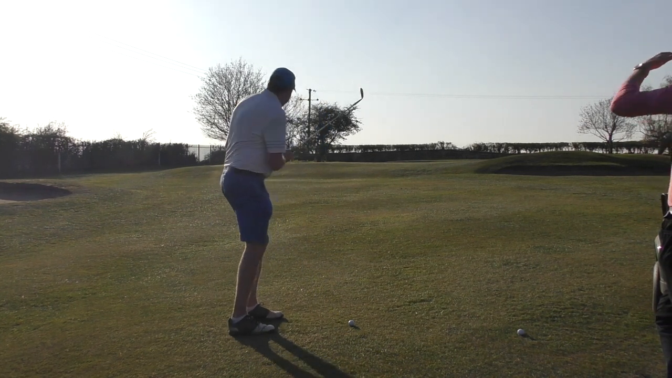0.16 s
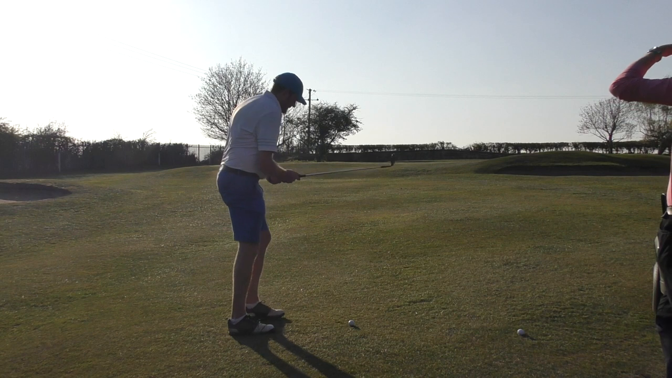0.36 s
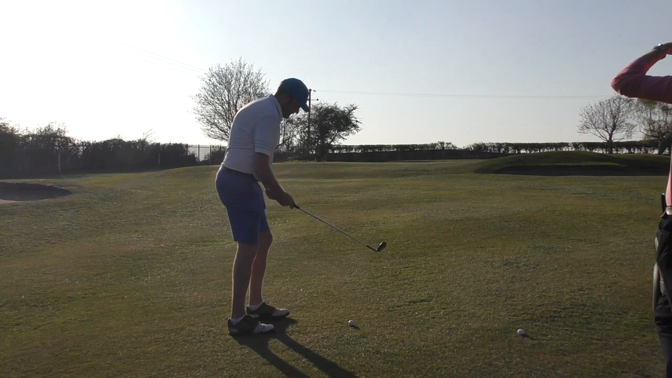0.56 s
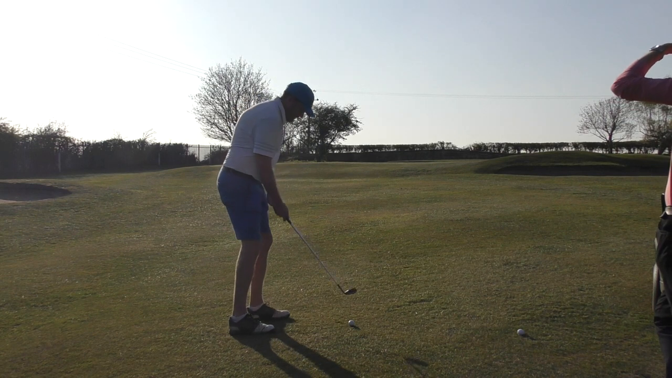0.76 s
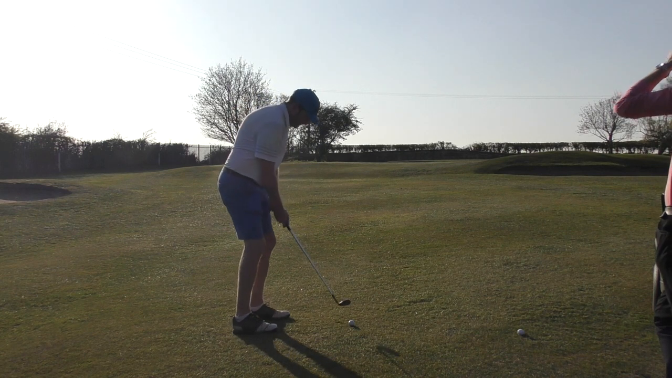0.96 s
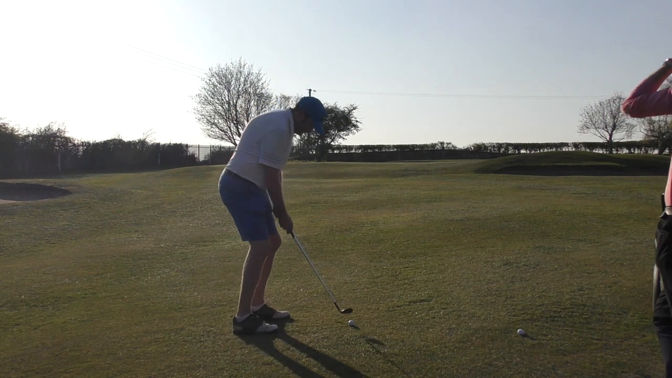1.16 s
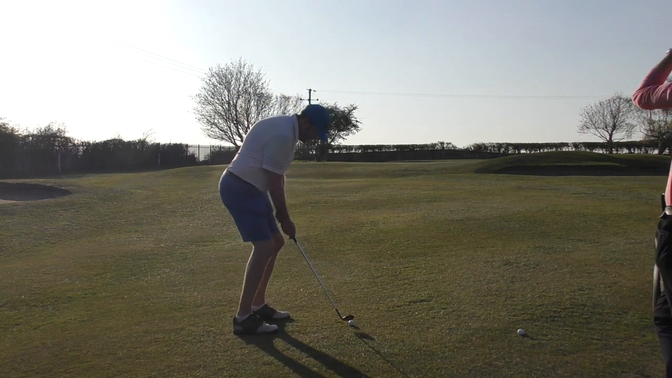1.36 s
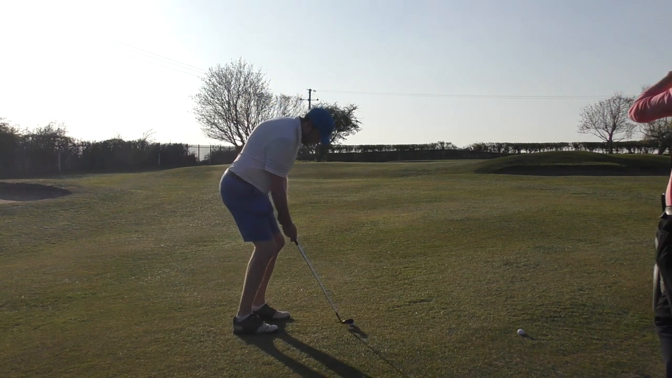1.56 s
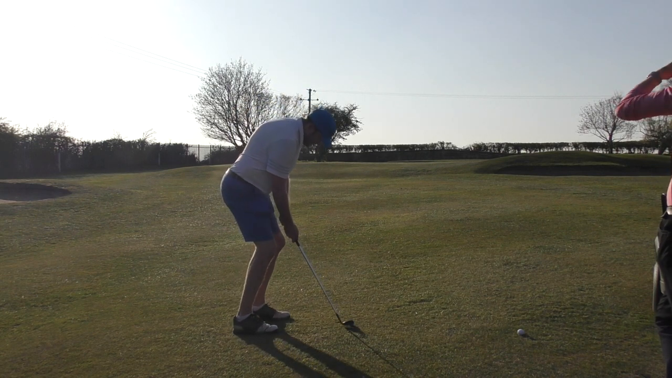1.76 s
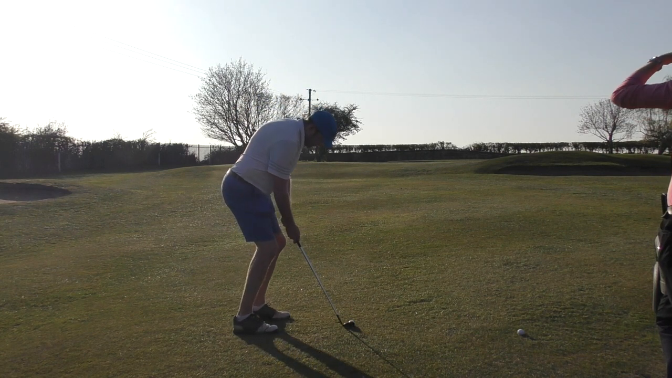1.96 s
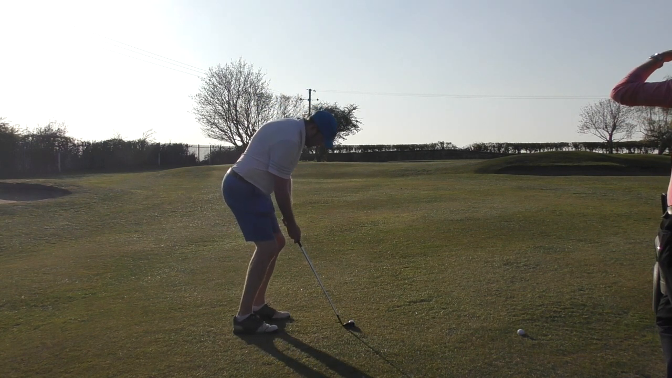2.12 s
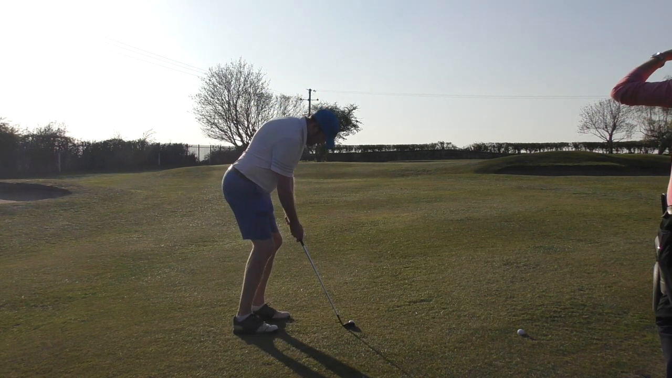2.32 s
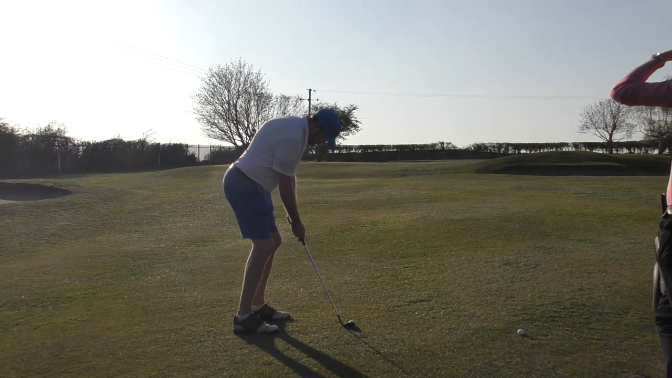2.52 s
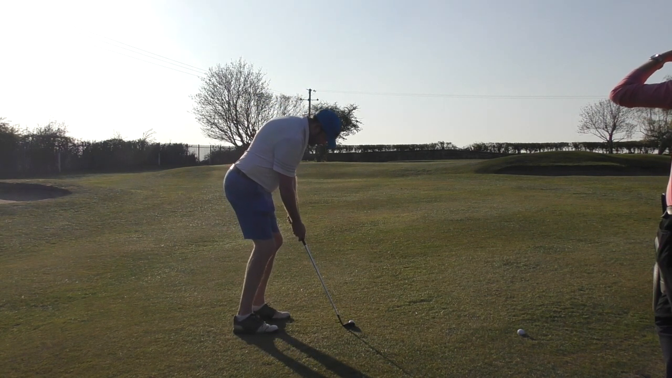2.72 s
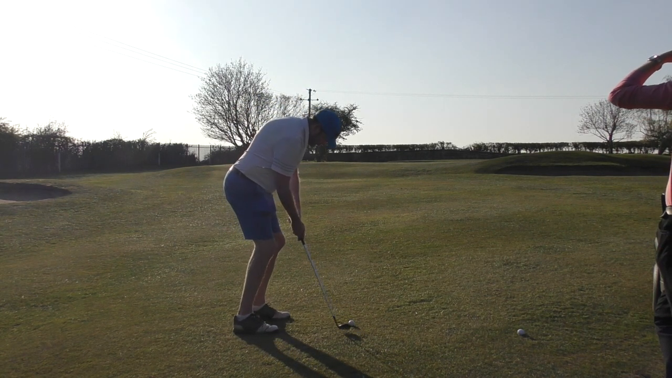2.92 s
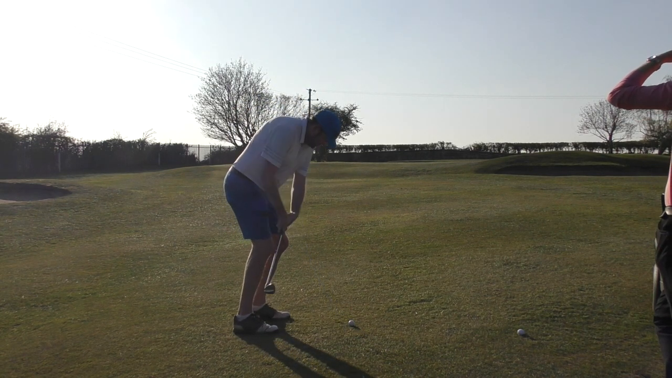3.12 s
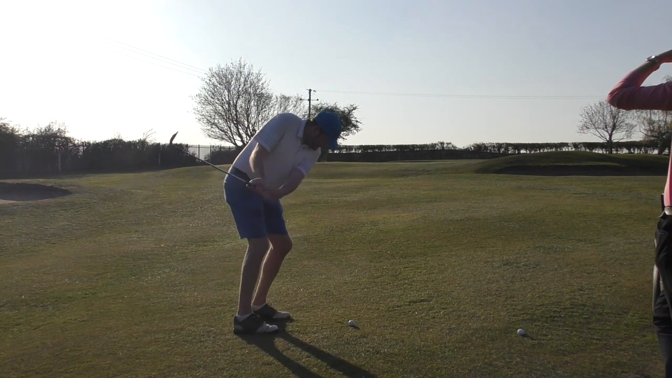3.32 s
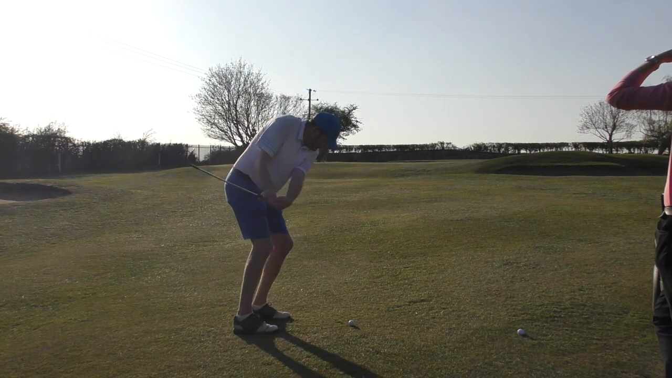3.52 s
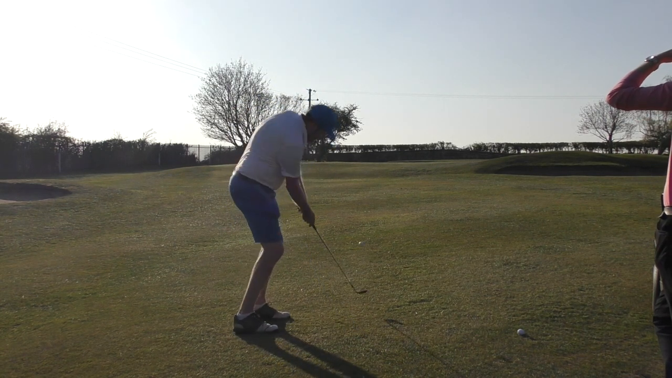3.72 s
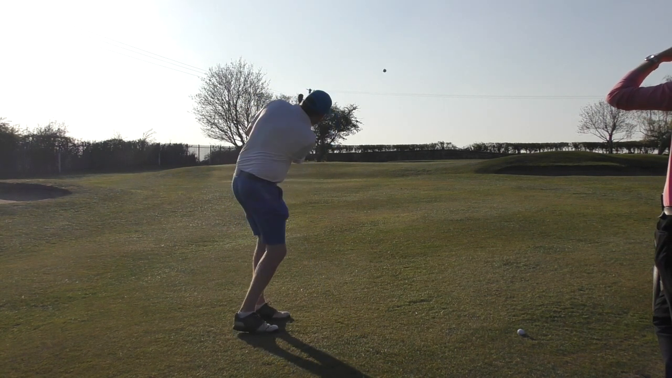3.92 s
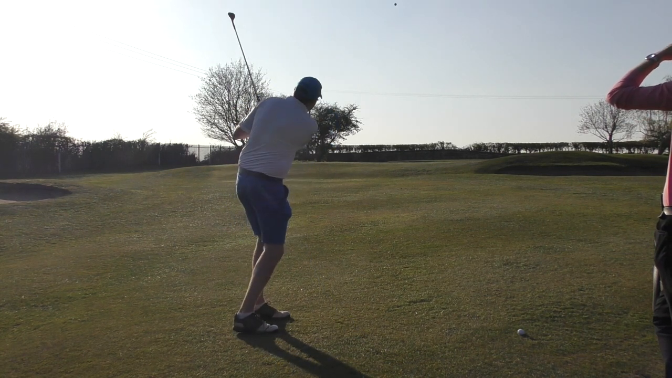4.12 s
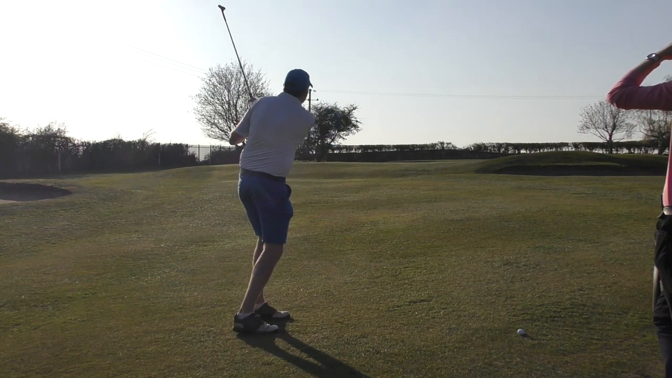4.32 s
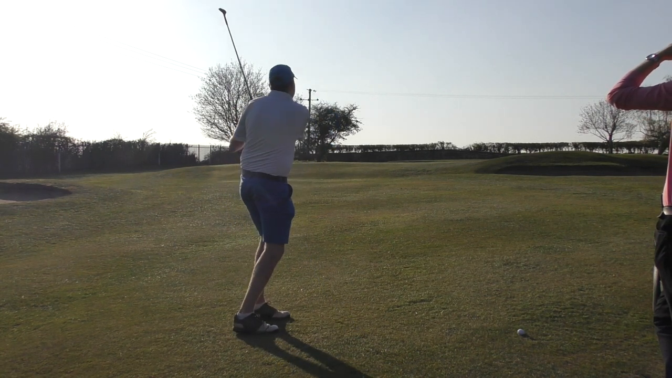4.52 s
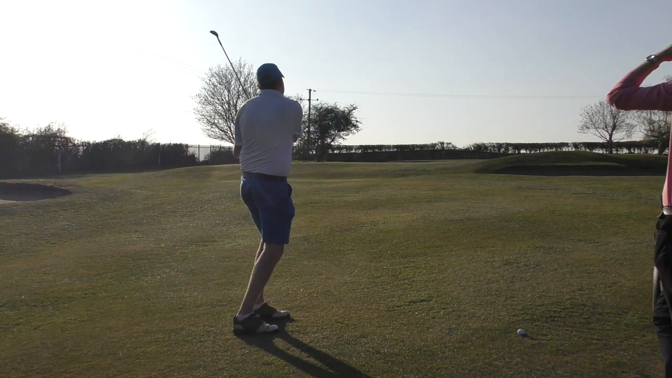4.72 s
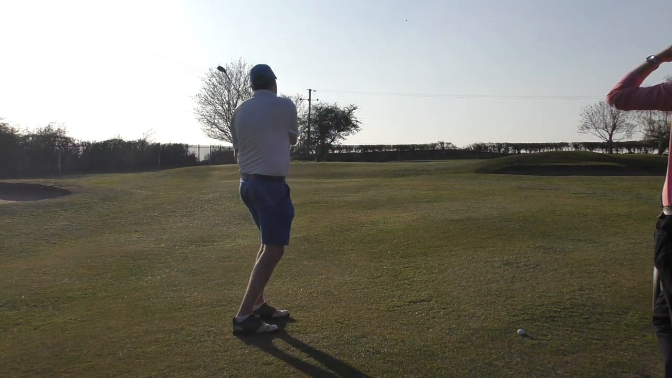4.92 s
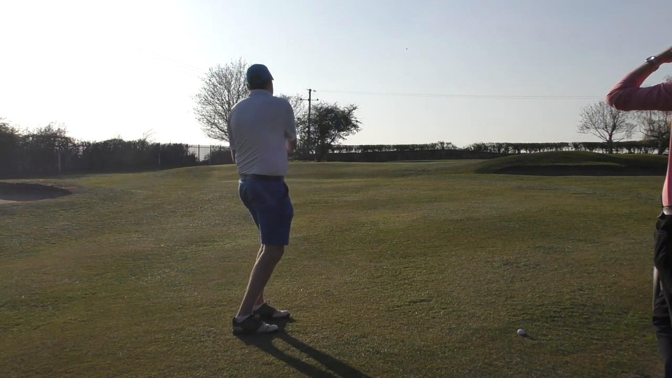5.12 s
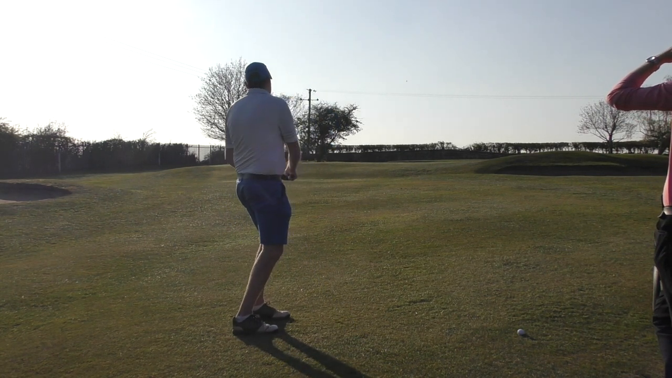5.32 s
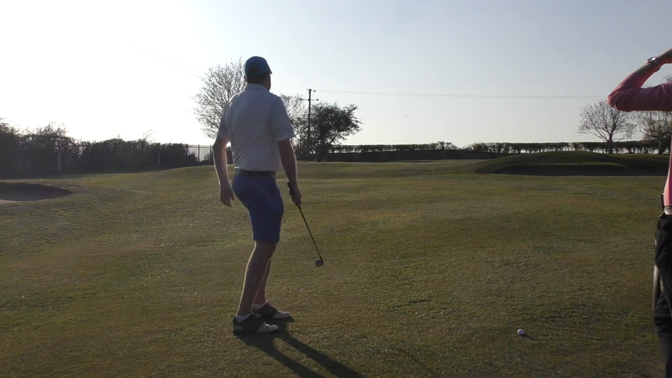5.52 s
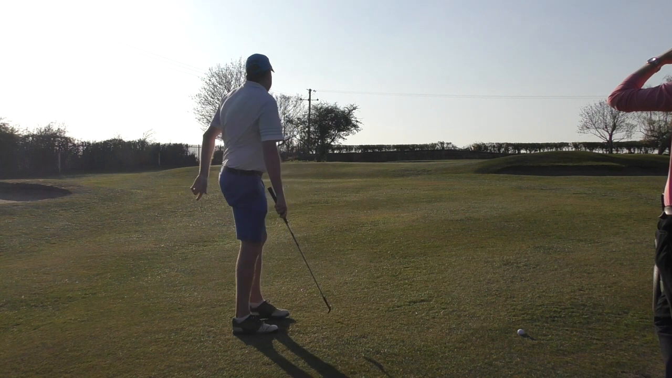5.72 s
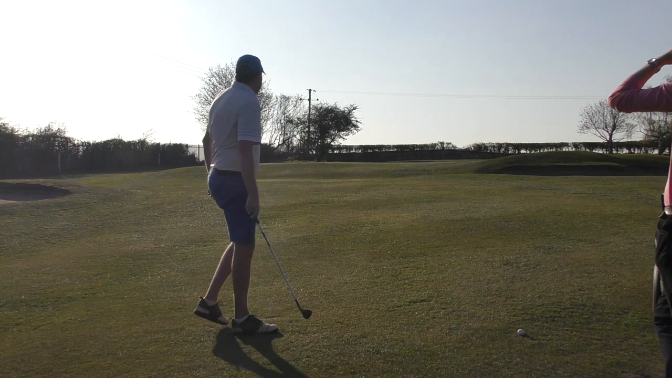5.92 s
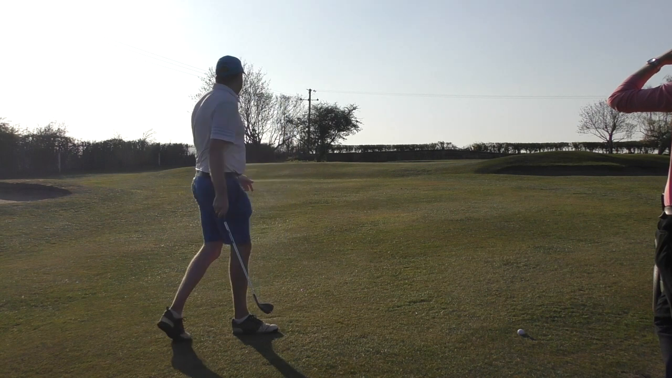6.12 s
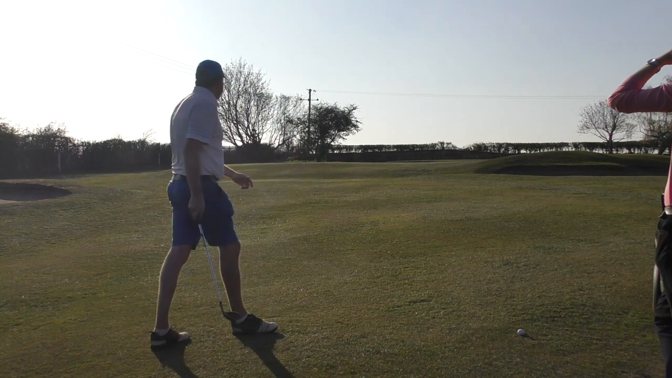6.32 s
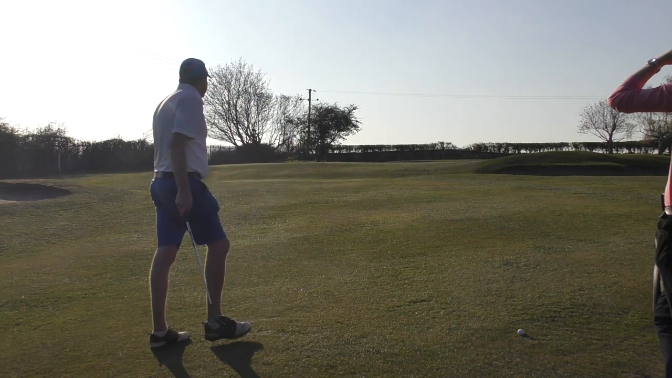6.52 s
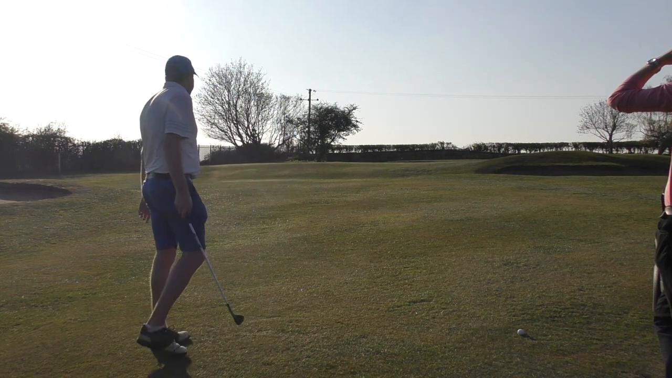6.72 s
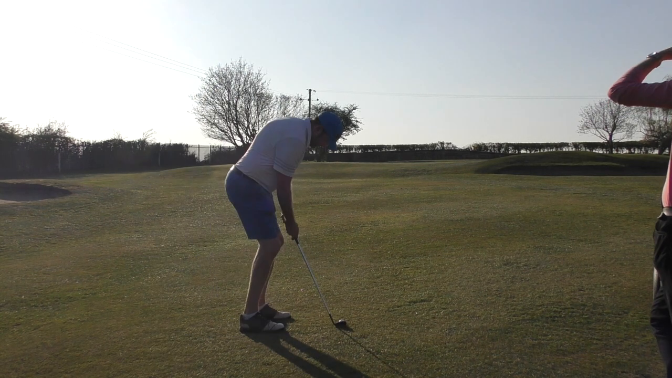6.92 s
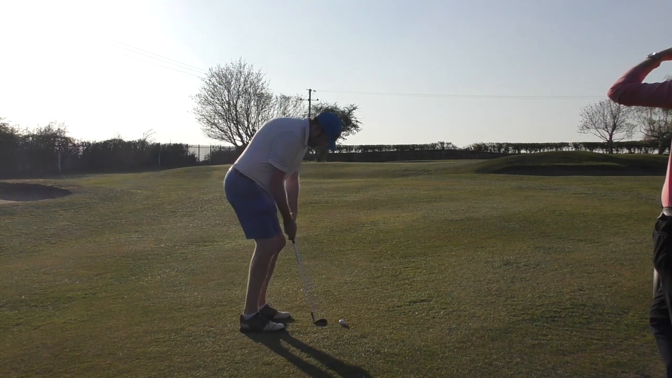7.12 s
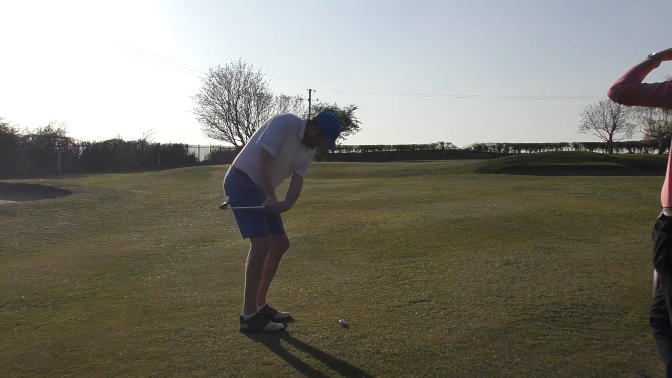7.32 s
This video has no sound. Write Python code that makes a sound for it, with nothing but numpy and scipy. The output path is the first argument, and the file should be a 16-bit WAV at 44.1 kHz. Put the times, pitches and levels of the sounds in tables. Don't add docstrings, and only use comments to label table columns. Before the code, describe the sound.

A golf iron strikes a ball with one loud, dry, sharp click on an open course, over faint birdsong and a low distant rumble.

```python
import sys
import numpy as np
from scipy import signal
from scipy.fft import rfft, irfft
from scipy.io import wavfile
from scipy.ndimage import uniform_filter1d

SR = 44100
rng = np.random.default_rng(int(sys.argv[2]) if len(sys.argv) > 2 else 0)


def bounce(signal):
    frames = np.transpose(np.atleast_2d(signal))
    limited = np.clip(frames, -1, 1)
    pcm = np.round(limited * 32767).astype(np.int16)
    wavfile.write(sys.argv[1], SR, pcm)


def ratio(d):
    e = np.asarray(d, float) / 20
    return 10 ** e


N = 324884
T = np.arange(N) / SR


def unit(x):
    return x / np.sqrt(np.mean(x ** 2))


def curve(rows):
    return np.interp(T, *np.transpose(rows))


def filtered_noise(low_hz, high_hz):
    sos = signal.butter(2, [low_hz, high_hz], "band", fs=SR, output="sos")
    return unit(signal.sosfilt(sos, rng.standard_normal(N)))


def band(n, hz, width_hz):
    settle = 2000
    b, a = signal.iirpeak(hz, hz / (1.5 * width_hz), SR)
    once = signal.lfilter(b, a, rng.standard_normal(n + settle))
    return unit(signal.lfilter(b, a, once)[settle:])


def walk(rate_hz):
    hold = int(SR / rate_hz)
    steps = np.repeat(rng.standard_normal(N // hold + 1), hold)
    return unit(uniform_filter1d(uniform_filter1d(steps, hold), hold)[:N])


def add(out, s, x):
    i = int(s * SR)
    out[i:i + len(x)] += x[:N - i]


def ring(hz, t60_s, length_s=.25):
    t = T[:int(length_s * SR)]
    return np.sin(2 * np.pi * hz * t) * 1000. ** (-t / t60_s)


# f/Hz, density/dB per Hz
TRAFFIC_SPECTRUM = [(55, -18.5), (75, -1), (110, -9.5), (200, -8.5), (280, -11), (420, -9), (520, -7.5),
                    (900, -9), (1250, -8.5), (1700, -17), (2300, -23), (4100, -27.5), (7000, -33),
                    (15800, -37.5)]
# t/s, level/dB
TRAFFIC_SWELL = [(0, -56), (1.99, -57.5), (2.47, -56.5), (3.6, -56), (5.9, -55.5), (6.33, -53.5),
                 (6.92, -57), (7.37, -57)]


def traffic():
    level_db, flicker_db, flicker_hz = -52, 0.252, 8.7
    f = np.maximum(np.arange(N // 2 + 1) * SR / N, 1)
    knot_hz, knot_db = np.transpose(TRAFFIC_SPECTRUM)
    noise = rfft(rng.standard_normal(N)) * ratio(np.interp(np.log(f), np.log(knot_hz), knot_db))
    gain = ratio(level_db) / np.std(irfft(noise, N))
    swell_db = curve(TRAFFIC_SWELL)
    swell_db = swell_db - swell_db.mean()
    out = np.zeros(N)
    for octave in range(9):
        share = np.clip(1 - abs(np.log2(f / 62.5) - octave), 0, 1)
        road = np.exp(-(octave - 3.5) ** 2 / 5)
        out += irfft(noise * share, N) * ratio(road * swell_db + flicker_db * walk(flicker_hz))
    return gain * out


# t/s, level/dB
WIND_GUSTS = [(0, -38), (.5, -34.5), (.96, -33), (1.4, -43.5), (2.1, -40), (2.7, -45), (3.3, -45.5),
              (3.67, -36.5), (4.3, -43), (5, -39), (5.5, -36.5), (6.0, -37.5), (6.5, -32.5), (7.0, -35),
              (7.37, -37)]


def wind():
    return ratio(curve(WIND_GUSTS)) * (filtered_noise(5, 14) + ratio(-17.5) * filtered_noise(18, 75))


def mains_hum():
    mains_hz, rms_db, phase_rad = 50, -43.5, 4.08
    return ratio(rms_db + 3 + .3 * walk(3)) * np.sin(2 * np.pi * mains_hz * T + phase_rad)


# t/s, length/s, level/dB
ENGINE_SWELLS = [(.2, 0.11, -61), (.42, .6, -64), (1.42, 0.9, -64.5), (2.15, 0.72, -60), (2.8, 0.37, -60.5),
                 (3.22, 0.2, -59), (3.45, 0.12, -63), (3.85, .55, -61), (4.45, .4, -65.5),
                 (4.901, 0.23, -61), (6.35, .2, -65), (6.923, 0.26, -56)]


def engine_drone():
    tone_hz, floor_db = 132, -69.5
    level = np.full(N, ratio(floor_db))
    for s, length_s, db in ENGINE_SWELLS:
        add(level, s, ratio(db) * signal.windows.tukey(int(length_s * SR), .6))
    flutter = ratio(3 * walk(11))
    hz = tone_hz * (1 + .025 * walk(10))
    return level * flutter * np.sin(2 * np.pi * np.cumsum(hz) / SR)


def note(hz, db, flutter, soft=0.14):
    shape = signal.windows.tukey(len(hz), soft)
    return ratio(db + 4) * flutter * shape * np.sin(2 * np.pi * np.cumsum(hz) / SR)


# t/s, length/s, start f/Hz, end f/Hz, level/dB
FLUTE_NOTES = [(0.151, 0.075, 2270, 2330, -62), (0.328, 0.102, 2454, 2560, -66),
               (.688, .045, 2317, 2300, -67), (1.147, .093, 2130, 2370, -63.5),
               (2.291, .054, 2970, 2970, -73), (4.598, 0.051, 2280, 2075, -64),
               (4.653, 0.069, 2094, 2310, -61), (4.82, .07, 1960, 2590, -59.5),
               (4.902, 0.13, 2810, 2700, -74), (5.073, .19, 2560, 2004, -59),
               (5.35, .19, 2010, 2460, -62.5), (5.563, 0.15, 2070, 2255, -59.5),
               (5.808, .055, 2440, 2500, -64), (6.324, .11, 1950, 1964, -64.5),
               (6.45, .1, 1780, 1600, -60.5), (6.592, 0.049, 2700, 2770, -71),
               (6.619, 0.053, 2095, 2038, -65.5), (6.648, 0.11, 2010, 2270, -60)]
# t/s, length/s, start f/Hz, end f/Hz, level/dB
PIPER_NOTES = [(3.175, .12, 3900, 3780, -70.5), (3.441, .05, 3920, 3720, -66),
               (3.485, 0.044, 3950, 4220, -68), (4.287, 0.17, 3370, 3334, -68.5),
               (4.417, 0.094, 3050, 3040, -71.5), (4.54, 0.1, 3210, 3570, -67),
               (4.64, 0.262, 3730, 3700, -64.5), (4.898, 0.128, 3660, 3610, -75.5),
               (6.932, .1, 3750, 3614, -61.5), (7.027, 0.18, 3100, 2940, -74),
               (7.093, 0.095, 3610, 3630, -69)]
# t/s, length/s, start f/Hz, end f/Hz, level/dB
DOVE_COOS = [
    (6.518, 0.24, 462, 461, -63.5),
    (7.101, .24, 592, 576, -61),
]
# t/s, length/s, start
# f/Hz, end f/Hz, level/dB
HEDGE_CHEEPS = [(0.794, 0.083, 4880, 5200, -69), (.94, 0.081, 5100, 5180, -69.5),
                (3.925, .026, 5900, 6250, -71), (3.928, .05, 4980, 5080, -67.5),
                (3.993, 0.042, 5080, 5050, -71), (4.074, .03, 4800, 5060, -70),
                (4.12, 0.048, 5000, 4940, -77), (5.83, .046, 4800, 5000, -74),
                (6.797, .059, 5800, 6000, -73), (6.798, 0.053, 5170, 5350, -62.5),
                (6.92, .035, 4650, 5080, -63), (6.925, .015, 5970, 6300, -66),
                (6.929, .032, 5500, 5750, -66)]
# t/s, f/Hz, level/dB
PIPER_PIPS = [(2.103, 3310, -66), (2.163, 3360, -63), (5.501, 3730, -61), (5.665, 3850, -58),
              (5.73, 3830, -65), (5.76, 3130, -61), (6.03, 4430, -77), (6.049, 3540, -65),
              (6.09, 3510, -75), (6.11, 3170, -70), (6.139, 3480, -70), (6.188, 4400, -70),
              (6.245, 3770, -66), (6.285, 3200, -72), (6.348, 3210, -65), (6.801, 4250, -68),
              (6.824, 3500, -60)]
# t/s, length/s, start f/Hz, level/dB
HEDGE_FLICKS = [
    (3.89, .02, 6340, -74),
    (3.986, .015, 5000, -69),
    (4.115, 0.014, 4830, -71.5),
    (5.955, .025, 5290, -69),
    (6.835, 0.01, 5250, -62),
    (6.842, .015, 5400, -70),
    (6.957, 0.038, 5340, -56),
    (6.983, 0.0184, 5700, -70.5),
]
# t/s, level/dB
HIGH_SEEPS = [
    (.475, -77),
    (.578, -72),
    (.69, -71),
    (3.607, -75.5),
    (3.817, -64.5),
]
# t/s, level/dB
HIGH_HOOKS = [
    (1.422, -74.5),
    (4.835, -74),
]


def songbook():
    pip_s, pip_sag, flick_fall = 0.036, 0.014, 0.122
    seep_s, seep_from_hz, seep_to_hz = .043, 7800, 6750
    hook_s, hook_from_hz, hook_to_hz = .08, 5950, 6900
    songs = [(*row, 1.1) for row in [*FLUTE_NOTES, *PIPER_NOTES, *DOVE_COOS]]
    songs += [(*row, .7) for row in HEDGE_CHEEPS]
    songs += [(s, pip_s, hz, hz * (1 - pip_sag), db, 1.1) for s, hz, db in PIPER_PIPS]
    songs += [(s, length_s, hz, hz * (1 - flick_fall), db, 2.1) for s, length_s, hz, db in HEDGE_FLICKS]
    songs += [(s, seep_s, seep_from_hz, seep_to_hz, db, 2.2) for s, db in HIGH_SEEPS]
    songs += [(s, hook_s, hook_from_hz, hook_to_hz, db, .3) for s, db in HIGH_HOOKS]
    return songs


def whistles(flutter):
    out, waver = np.zeros(N), 1 + .008 * walk(120)
    for s, length_s, start_hz, end_hz, db, bend in songbook():
        i, u = int(s * SR), np.linspace(0, 1, int(length_s * SR))
        glide = u ** bend if bend >= 1 else 1 - (1 - u) ** (1 / bend)
        hz = start_hz + (end_hz - start_hz) * glide
        add(out, s, note(hz * waver[i:i + len(u)], db, flutter[i:i + len(u)]))
    return out


# t/s, length/s, f/Hz, warble depth/Hz, level/dB
BUZZY_TRILLS = [(0.265, .11, 2367, 150, -61), (0.793, 0.094, 5090, 500, -69), (.94, .066, 4950, 500, -70),
                (5.385, .11, 4380, 220, -61), (5.494, 0.25, 4340, 286, -67), (5.518, .165, 3465, 230, -57),
                (5.696, 0.12, 3150, 231, -58.5), (5.78, 0.095, 3050, 300, -66), (3.21, .17, 3400, 170, -75),
                (5.97, .088, 4950, 300, -76), (6.077, 0.139, 3450, 230, -64),
                (6.21, 0.31, 3480, 302, -66.5), (6.84, 0.13, 3330, 200, -65.5), (6.922, .1, 5350, 610, -76),
                (6.804, 0.058, 5080, 804, -64)]


def trills(flutter):
    warble_hz = 225 * (1 + .06 * walk(30))
    warble = np.sin(2 * np.pi * np.cumsum(warble_hz) / SR) + .25 * walk(500)
    out = np.zeros(N)
    for s, length_s, hz, depth_hz, db in BUZZY_TRILLS:
        i, n = int(s * SR), int(length_s * SR)
        add(out, s, note(hz + depth_hz * warble[i:i + n], db, np.sqrt(flutter[i:i + n]), soft=.45))
    return out


# t/s, peak level/dB, f/Hz
CHIP_RUN = [(2.52, -64, 3380), (2.615, -61, 3510), (2.7, -62, 3340), (2.79, -61, 3360), (2.88, -61, 3430),
            (2.965, -65, 3550), (3.05, -66, 3520), (3.13, -62, 3520), (3.2, -60, 3460), (3.265, -62, 3280),
            (3.309, -65, 3420), (3.355, -74, 3440), (3.4, -61.5, 3340), (3.54, -66, 3330),
            (3.675, -59, 3410)]


def chips():
    out, rise = np.zeros(N), np.linspace(.97, 1.03, int(0.012 * SR))
    for s, db, hz in CHIP_RUN:
        add(out, s, note(hz * rise, db, 0.76))
    return out


def birds():
    trees_db, trees_t60_s, trees_top_hz = -4.5, .5, 4800
    flutter = ratio(3 * walk(90))
    song = whistles(flutter) + trills(flutter) + chips()
    t = T[:SR // 2]
    tail = rng.standard_normal(len(t)) * 1000. ** (-t / trees_t60_s) * np.minimum(t / .02, 1)
    tail = tail / np.sqrt(np.sum(tail ** 2))
    tail = signal.lfilter(*signal.butter(2, trees_top_hz, fs=SR), tail)
    return song + ratio(trees_db) * signal.fftconvolve(song * flutter[::-1], tail)[:N]


def rustles(rows, width):
    out, t = np.zeros(N), T[:SR // 2]
    for s, rise_s, t60_s, hz, db in rows:
        shape = np.where(t < rise_s, t / rise_s, 1000. ** (-(t - rise_s) / t60_s))
        grain = ratio(2.6 * np.repeat(rng.standard_normal(len(t) // 100 + 1), 100)[:len(t)])
        add(out, s, ratio(db) * shape * grain * band(len(t), hz, width * hz))
    return out


# t/s, rise/s, t60/s, centre f/Hz, level/dB
GRASS_RUSTLES = [
    (.831, .03, .24, 2500, -60.5),
    (3.716, .014, .015, 2500, -30),
    (3.725, .0013, 0.16, 1500, -41),
    (5.135, 0.009, 0.053, 5000, -63.5),
    (5.185, 0.0079, .04, 4900, -62.5),
    (5.399, .15, .5, 3760, -70),
    (5.8, .11, 0.98, 3100, -60.5),
    (6.09, .017, 0.11, 3000, -62),
    (6.362, .1, .15, 1500, -53.5),
    (6.791, 0.0043, 0.089, 3500, -56),
]


def grass():
    return rustles(GRASS_RUSTLES, 0.6)


# t/s, f/Hz, t60/s, peak level/dB
TURF_THUDS = [
    (5.9, 237, 0.028, -24.5),
    (6.114, 153, 0.051, -44),
    (6.69, 280, 0.026, -39.5),
]


def thuds():
    out = np.zeros(N)
    for s, hz, t60_s, db in TURF_THUDS:
        overtone = ratio(-4) * ring(5 * hz, t60_s / 9)
        tick = ratio(-22) * ring(4000, .012)
        add(out, s, -ratio(db) * (ring(hz, t60_s) - overtone + tick))
    return out


# t/s, rise/s, t60/s, centre f/Hz, level/dB
HEDGE_ECHOES = [
    (3.871, .0005, 0.037, 1780, -44.5),
    (3.88, .01, 0.091, 2590, -55),
    (3.9, .01, 0.27, 2000, -55),
]
# t/s, rise/s, t60/s, centre f/Hz, level/dB
TREE_SCATTER = [
    (3.83, 0.037, 1, 3980, -62.5),
    (3.869, .077, .25, 5900, -68),
]


def echoes():
    return rustles(HEDGE_ECHOES, .36) + rustles(TREE_SCATTER, .09)


# f/Hz, level/dB, t60/s
CLUB_MODES = [(430, -9, 0.0189), (696, -11.5, 0.0059), (1007, 1.5, 0.0038), (1278, -8, 0.01),
              (1950, -6, 0.0057), (4300, -28.5, .015), (1590, -16, 0.02), (2240, -7, 0.0095),
              (3040, -19.5, 0.021), (3900, 0, 0.011), (4040, -35, 0.0887), (4636, -28, 0.0134),
              (5714, -6.5, 0.0076), (5900, -46.5, 0.069), (6900, -19, 0.0064), (9520, -32, 0.0089),
              (10340, -25.5, 0.008), (11840, -35, .008)]
# t/s, level/dB, contact/ms (negative = push away from listener)
CLUB_BLOWS = [
    (3.7207, -15.5, 0.15),
    (3.724, -29.5, 0.12),
    (3.7222, -8.5, 1),
    (3.7241, -18, 0.1),
    (3.7257, 0.5, 0.02),
    (3.7338, -24, 0.15),
    (3.741, -29, 0.3),
    (3.8712, -40, 0.27),
]


def strike():
    out = np.zeros(N)
    body = sum(ratio(db) * ring(hz, t60_s) for hz, db, t60_s in CLUB_MODES)
    body = body * (1 - np.exp(-T[:len(body)] / 0.0001))
    for s, db, contact_ms in CLUB_BLOWS:
        span = max(abs(contact_ms) * SR / 1000, 1.5)
        push = np.sin(np.pi * np.clip((np.arange(int(span) + 1) + .5) / span, 0, 1))
        add(out, s, np.sign(contact_ms) * ratio(db) * np.convolve(body, push / push.sum()))
    return signal.sosfilt(signal.butter(2, 170, "high", fs=SR, output="sos"), out)


def scene():
    background = traffic() + wind() + mains_hum() + engine_drone() + birds()
    return (background + grass() + thuds() + echoes() + strike())[None]


def band_limit(x):
    return signal.sosfilt(signal.butter(12, 16420, fs=SR, output="sos"), x)


def record(dry):
    clipped = np.clip(dry, -.96, .96)
    mix = signal.sosfilt(signal.ellip(6, .3, 60, 16000, fs=SR, output="sos"), clipped)
    return band_limit(mix)


dry = scene()
out = record(dry)
bounce(out)
```